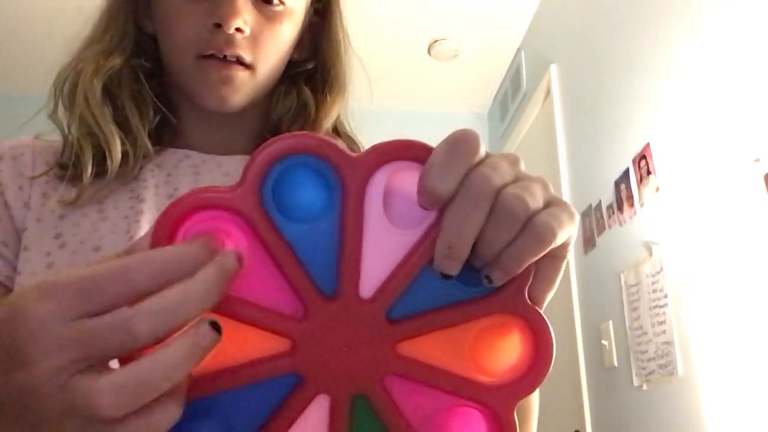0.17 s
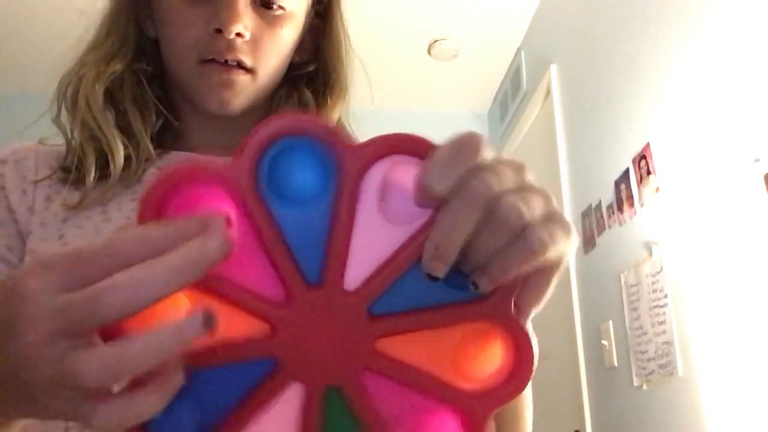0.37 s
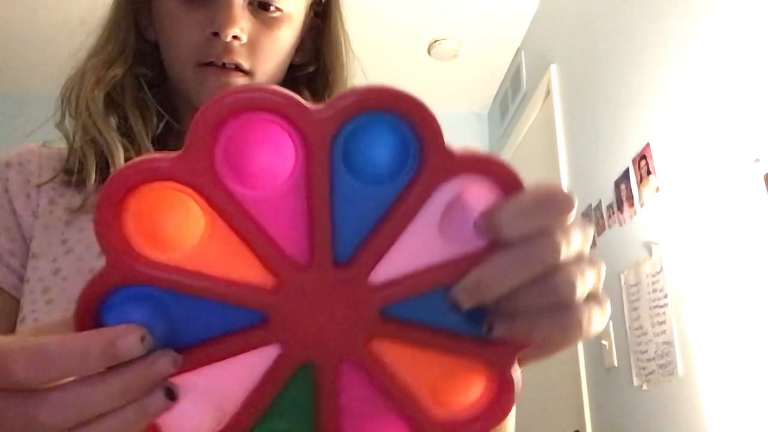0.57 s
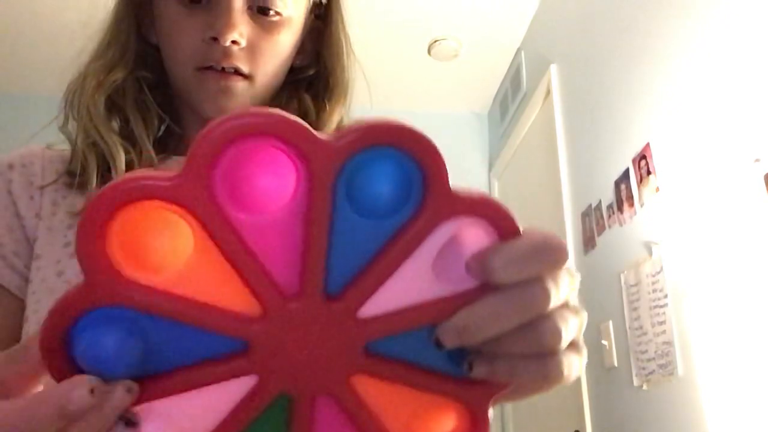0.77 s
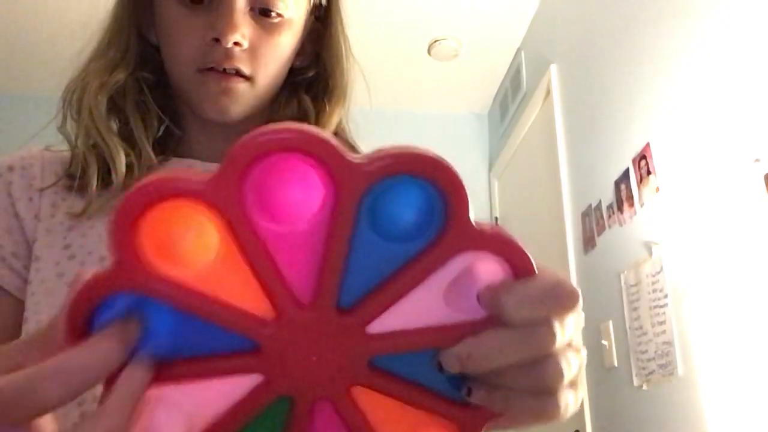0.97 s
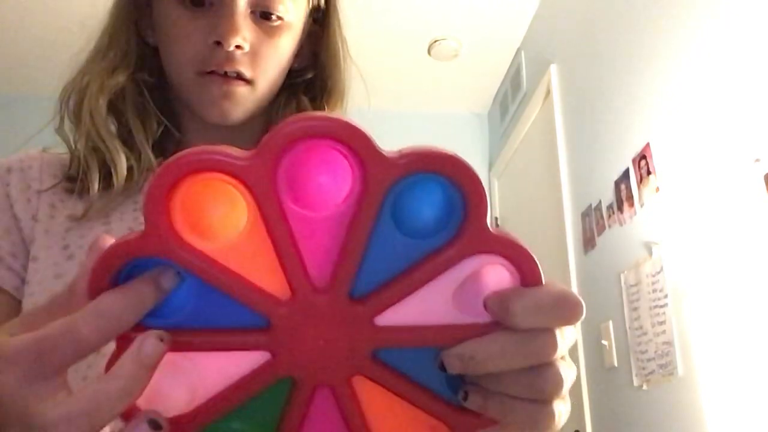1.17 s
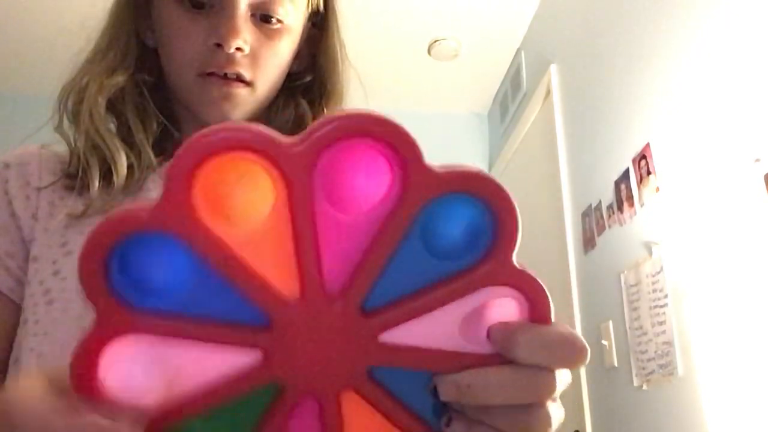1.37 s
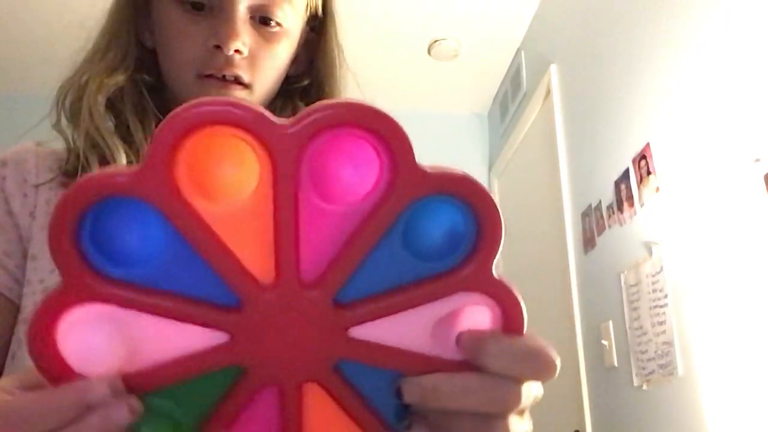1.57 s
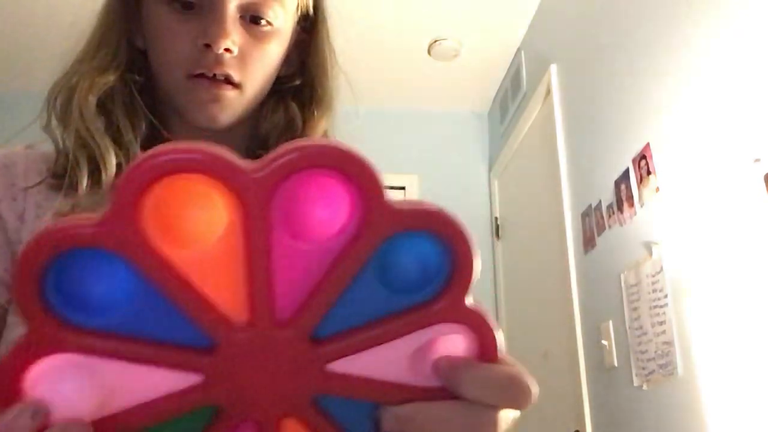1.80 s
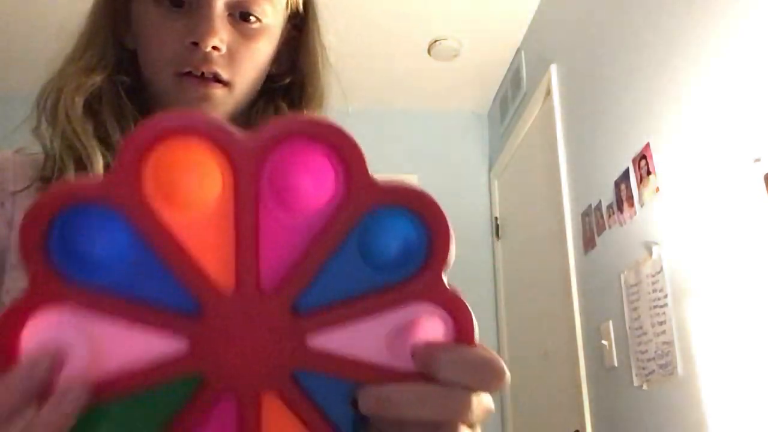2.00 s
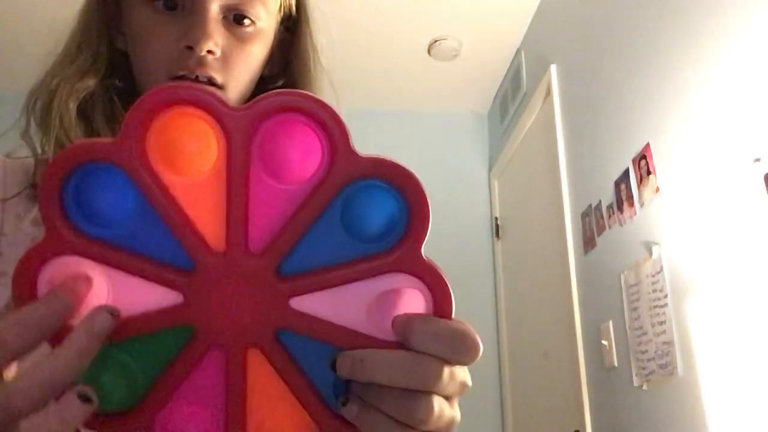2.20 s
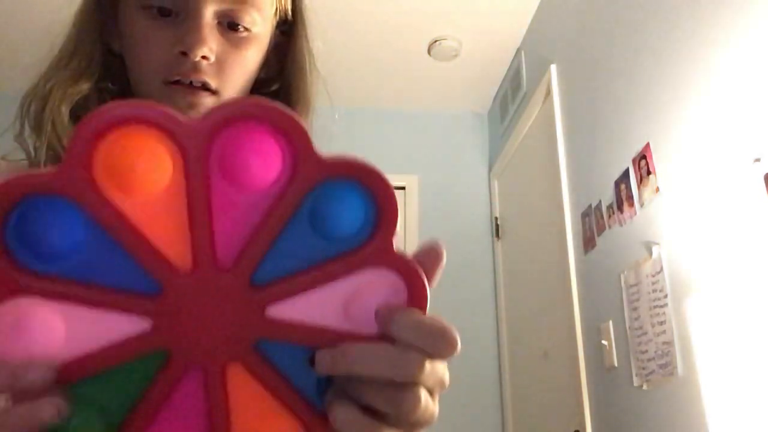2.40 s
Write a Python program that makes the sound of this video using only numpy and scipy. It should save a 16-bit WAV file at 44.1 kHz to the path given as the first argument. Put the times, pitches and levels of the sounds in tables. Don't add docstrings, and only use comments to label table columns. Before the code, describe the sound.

A silicone push-pop toy is pressed close to a laptop microphone in a small bedroom. The loudest pop, a quick sharp double snap, comes at 0.2 seconds; softer, hollower pops follow near 1.0 and 1.1, then a strong one at 2.16. Faint taps, skin rubs and grip rustle fill the gaps, with tiny clicks at 2.3-2.4. Short room reflections, low rumble and faint hiss.

```python
import sys
import numpy as np
from scipy import signal
from scipy.fft import rfft, irfft
from scipy.io import wavfile
from scipy.ndimage import uniform_filter1d

SR = 44100
rng = np.random.default_rng(int(sys.argv[2]) if len(sys.argv) > 2 else 0)


def bounce(signal):
    frames = np.transpose(np.atleast_2d(signal))
    limited = np.clip(frames, -1, 1)
    pcm = np.round(limited * 32767).astype(np.int16)
    wavfile.write(sys.argv[1], SR, pcm)


def undo_db(level):
    steps = np.asarray(level, float) / 20
    return 10 ** steps


N = 108045
ROOM_RISE_S = 0.0027


def unit(x):
    return x / np.sqrt(np.mean(x ** 2))


def band(x, hz, width_hz):
    q = max(hz / width_hz, .3)
    return signal.lfilter(*signal.iirpeak(min(hz, .45 * SR), q, SR), x)


def decay_width(t60_s):
    return np.log(1000) / np.pi / t60_s


def add(out, start_s, x):
    i = int(start_s * SR)
    out[i:i + len(x)] += x[:N - i]


def ring(db, hz, t60_s, rise_s, excess=0.):
    glide_s = 0.00068
    t = np.arange(int(t60_s * SR)) / SR
    turns = hz * (t + excess * glide_s * (1 - np.exp(-t / glide_s)))
    envelope = undo_db(db - 60 * t / t60_s) * (1 - np.exp(-t / rise_s))
    return envelope * np.sin(2 * np.pi * turns)


def walk(rate_hz):
    k = int(SR / rate_hz)
    steps = np.repeat(rng.standard_normal(N // k + 1), k)
    return unit(uniform_filter1d(uniform_filter1d(steps, k), k)[:N])


def hush():
    # hz, density_db (per Hz)
    spectrum = [(32, -14), (58, 2), (250, -11), (450, -20), (1000, -23), (3000, -26), (9500, -33),
                (15800, -45)]
    at_hz, density_db = np.array(spectrum).T
    hz = np.arange(N // 2 + 1) * SR / N + 1
    noise = rfft(rng.standard_normal(N)) * undo_db(np.interp(np.log(hz), np.log(at_hz), density_db))
    low = 1 / (1 + (hz / 350) ** 2)
    rumble = irfft(noise * low, N) * undo_db(1.5 * walk(5.4))
    hiss = irfft(noise * (1 - low), N) * undo_db(-0.37 * walk(14))
    return unit(rumble + hiss) * undo_db(-67)


def room(x):
    # hz, level_db, t60_s
    tail_bands = [(150, -39, .14), (330, -37, .15), (650, -42, .19), (1300, -37, .17), (2200, -37, 0.13),
                  (3500, -43, .16), (6950, -33, 0.12), (12000, -39, .14)]
    t = np.arange(SR // 2) / SR
    tail = np.zeros(len(t))
    for hz, db, t60_s in tail_bands:
        noise = rng.standard_normal(len(t))
        colour = unit(band(band(noise, hz, hz * 1.3), hz, hz * 1.3))
        tail += colour * undo_db(db - 60 * t / t60_s) * np.sqrt(hz / SR / 2)
    tail *= 1 - np.exp(-(t / ROOM_RISE_S) ** 2)
    return signal.fftconvolve(x, tail)[:N]


def spray():
    # start_s, rms_db, hz, width_hz, t60_s
    hazes = [
        (.225, -46, 1600, 2200, .22),
        (.225, -47, 350, 250, .25),
        (.984, -51, 550, 200, .3),
        (.984, -63, 2000, 3000, .2),
        (1.125, -54, 1100, 900, .2),
        (2.167, -49, 2800, 3000, .18),
        (2.167, -60, 8500, 6000, .13),
        (2.167, -46, 480, 500, .28),
        (1.125, -56, 330, 200, .25),
    ]
    out, t = np.zeros(N), np.arange(SR // 4) / SR
    for (start_s, db, hz, width_hz, t60_s), noise in zip(hazes, rng.standard_normal((10, len(t)))):
        colour = unit(band(band(noise, hz, width_hz), hz, width_hz))
        add(out, start_s, colour * undo_db(db - 60 * t / t60_s) * (1 - np.exp(-t / ROOM_RISE_S)))
    return out


def rustle():
    # time_s, rustle_db
    grip = [
        (0, -86),
        (.35, -80),
        (.6, -82),
        (0.802, -86),
        (1.25, -80),
        (1.5, -78),
        (1.8, -80),
        (2.049, -86),
        (2.3, -79),
        (2.45, -84),
    ]
    at_s, level_db = np.array(grip).T
    chance = rng.random((2, N))
    grains = (chance[0] < 1500 / SR) * (chance[1] - .5) ** 3
    body = np.zeros(N)
    for hz, db in [(500, 6), (1300, 0), (3000, -5)]:
        body += undo_db(db) * band(band(grains, hz, hz * .8), hz, hz * .8)
    return unit(body * undo_db(3 * walk(30))) * undo_db(np.interp(np.arange(N) / SR, at_s, level_db))


def rubs():
    # start_s, length_s, rms_db, hz, width_hz
    strokes = [(0.171, 0.031, -61, 7900, 9000), (0.095, 0.071, -71.5, 570, 150),
               (.452, 0.044, -63, 2650, 3000), (.455, .04, -66, 600, 700), (.405, .025, -66, 500, 600),
               (1.29, .04, -66, 500, 700), (0.7, 0.045, -69, 520, 300), (1.228, 0.015, -78, 12000, 2000),
               (1.29, 0.023, -65, 2330, 3000), (1.424, 0.12, -74.5, 1500, 2500),
               (1.521, .045, -69, 628, 220), (1.771, 0.024, -59.5, 3140, 495),
               (1.764, .02, -66, 3400, 4000), (1.96, 0.026, -71.5, 1520, 3000),
               (2.338, 0.05, -69, 1500, 3000), (1.625, .04, -70, 3300, 3000),
               (1.765, .025, -66, 1200, 1500), (.46, .04, -66, 370, 200)]
    out = np.zeros(N)
    chance = rng.standard_normal((20, 2, 8192))
    for (start_s, length_s, db, hz, width_hz), (noise, grain) in zip(strokes, chance):
        n = min(int(0.71 * length_s * SR), len(noise))
        rough = noise * undo_db(3.5 * unit(uniform_filter1d(grain, 60)))
        colour = unit(band(band(rough, hz, width_hz), hz, 0.64 * width_hz))
        add(out, start_s, undo_db(db) * colour[:n] * np.hanning(n) ** .5)
    return out


def clicks(contacts, cycles, excess, rise_cycles):
    out, t = np.zeros(N), np.arange(512) / SR
    grit = rng.standard_normal((40, len(t)))
    fade = undo_db(-60 * t / .006) + undo_db(-16 - 60 * t / .025)
    for (start_s, db, hz, crackle_db), noise in zip(contacts, grit):
        add(out, start_s, -ring(db, hz, cycles / hz, rise_cycles / hz, excess))
        crackle = band(noise, 5000, 9000) + undo_db(-10) * band(noise, 11500, 5000)
        add(out, start_s, crackle * undo_db(crackle_db - 1.5) * fade)
    return out


def taps():
    # start_s, ring_db, ring_hz, crackle_db
    touches = [(.385, -43, 3780, -54), (.388, -45, 1040, -61.5), (.409, -50, 3500, -55.5),
               (.417, -48, 1400, -66), (.537, -60.5, 1535, -54), (.541, -54, 3040, -76),
               (.561, -49, 800, -64), (.666, -52, 600, -68), (1.275, -41, 2500, -66),
               (1.2752, -47, 4000, -70), (1.276, -52, 1100, -70), (1.294, -50, 1300, -70),
               (1.293, -41, 2390, -70.5), (1.32, -78, 6000, -47), (1.64, -61, 3300, -68),
               (1.65, -50.5, 640, -70), (1.719, -51, 1300, -64.5), (1.877, -52, 602, -64),
               (1.967, -51, 505, -66), (2.231, -52, 8000, -50), (2.313, -52, 3600, -58),
               (2.314, -55, 1100, -66), (2.321, -58, 2500, -68), (1.878, -58, 2600, -64),
               (1.945, -58, 2800, -68), (1.967, -57, 2700, -66), (.186, -52, 500, -66), (.2, -50, 450, -68),
               (.187, -58, 1500, -66), (2.381, -55, 3700, -64), (2.382, -57, 1250, -70),
               (1.425, -60, 1200, -72), (1.461, -59, 1500, -68), (1.666, -60, 1250, -76),
               (2.3382, -43, 4200, -56), (2.409, -45, 3900, -60), (2.4094, -43, 1550, -66)]
    return undo_db(-1.5) * clicks(touches, cycles=8, excess=.15, rise_cycles=.12)


def ticks():
    # start_s, ring_db, ring_hz, crackle_db
    cracks = [(.2109, -15, 2800, -28), (.2116, -14, 2780, -15), (.2209, -28.5, 4000, -29.5),
              (.222, -6.5, 3750, -29.5), (.979, -30, 4800, -44), (.9788, -28, 1700, -50),
              (.2219, -17, 1200, -40), (.2115, -23, 1170, -40), (.2113, -20, 4300, -40),
              (2.1626, -17, 1270, -40), (2.158, -30, 1500, -50), (1.1213, -26, 4050, -40),
              (1.1186, -32, 5850, -38), (1.1208, -23, 3060, -42), (2.1575, -33.5, 5500, -35.5),
              (2.1623, -15, 2250, -23), (2.1635, -23, 4200, -36), (2.163, -30, 3350, -40),
              (2.3381, -35, 2350, -50), (2.3392, -42, 3800, -56), (2.343, -46, 1300, -54),
              (2.3383, -42, 1500, -60), (1.1215, -27, 1500, -60), (2.4088, -40, 2300, -56.5)]
    return clicks(cracks, cycles=12, excess=.03, rise_cycles=.45)


def frame(x):
    # hz, level_db, t60_s
    modes = [(1360, -3, .015), (2200, -11, .015), (2810, -2, 0.014), (4250, -6, .015), (4850, -15, .015),
             (10830, -6, .01)]
    return x + sum(undo_db(db) * band(x, hz, decay_width(t60_s)) for hz, db, t60_s in modes)


def domes():
    flip_s = [.2117, .2222, .9792, 1.1189, 1.1212, 1.1222, 2.1577, 2.163, 2.339, 2.3447, 2.4092]
    # peak_db, settled_hz, t60_s, excess (relative initial pitch), rise_s
    flips = [(0, 480, 0.0085, .5, .0025), (-8, 345, .016, 3.2, 0.00008), (-9, 471, 0.012, .05, 0.0013),
             (-34, 1000, 0.0091, .3, 0.00014), (-9.5, 704, 0.009, 0.63, 0.00015), (-24, 390, .02, .1, .001),
             (-12, 520, .009, 0.16, 0.0018), (-6, 450, 0.0091, 1.1, 0.00008),
             (-38, 553, 0.015, 0.86, 0.00015), (-37, 450, 0.019, 0.23, 0.00017),
             (-36, 424, 0.0079, 0.91, 0.00029)]
    wobble_s = [.2225, .981, 1.1209, 2.1642, .418, .5225, .563, .59, .868, 1.3, 1.43, 1.718]
    # peak_db, hz, t60_s
    wobbles = [(-13.5, 230, .045), (-27, 125, 0.034), (-16, 153, 0.027), (-17.5, 173, 0.032),
               (-47.5, 200, 0.056), (-43, 120, 0.065), (-53, 161, 0.15), (-49, 70, 0.17), (-42, 95, .05),
               (-52.5, 94, .1), (-49.5, 78, .1), (-47, 104, 0.045)]
    out = np.zeros(N)
    for start_s, (db, hz, t60_s, excess, rise_s) in zip(flip_s, flips):
        add(out, start_s, ring(db, hz, t60_s, rise_s, excess))
    for start_s, (db, hz, t60_s) in zip(wobble_s, wobbles):
        add(out, start_s, ring(db, hz, t60_s, rise_s=0.002))
    hum = band(out, 610, decay_width(.2))
    return out + undo_db(-14) * hum


def scene():
    near = domes() + frame(ticks() + taps()) + rubs() + rustle()
    near = signal.sosfilt(signal.butter(2, 87, "high", fs=SR, output="sos"), near)
    near = signal.sosfilt(signal.butter(4, 13300, fs=SR, output="sos"), near)
    echo = undo_db(-24) * np.roll(near, int(0.0097 * SR))
    return (near + echo + room(near) + hush() + spray())[None]


def low_pass(x):
    return signal.sosfilt(signal.butter(12, 16790, fs=SR, output="sos"), x)


def record(dry):
    x = signal.sosfilt(signal.butter(3, 45, "high", fs=SR, output="sos"), dry)
    x = signal.sosfilt(signal.ellip(8, .2, 70, 16200, fs=SR, output="sos"), x)
    return low_pass(x)


dry = scene()
out = record(dry)
bounce(out)
```